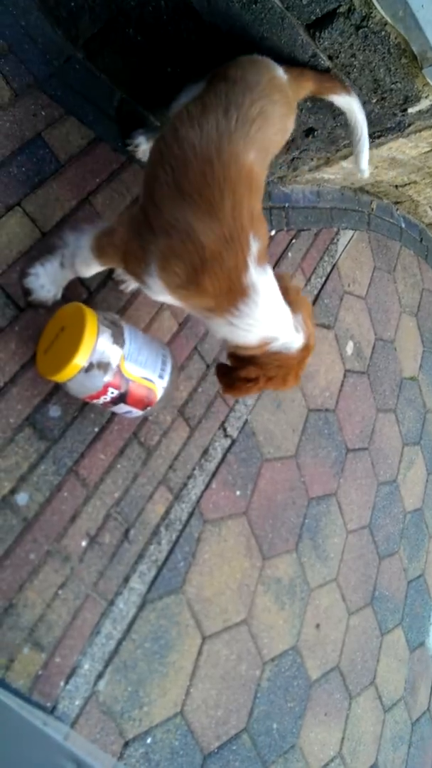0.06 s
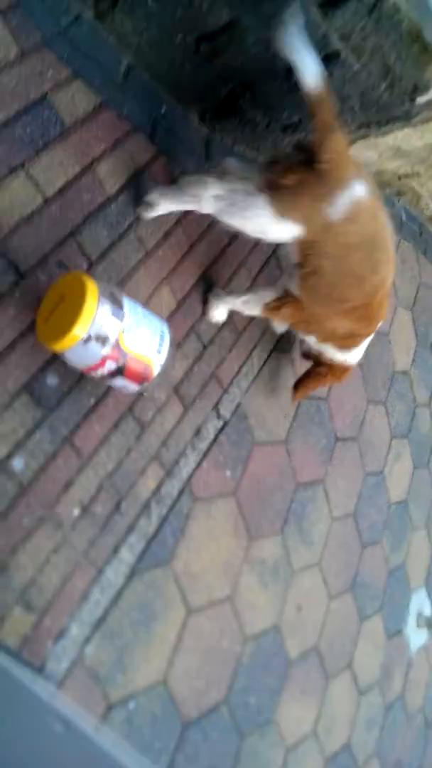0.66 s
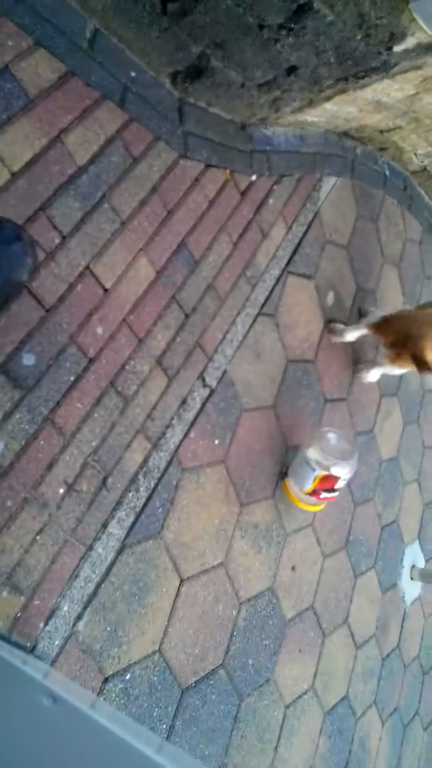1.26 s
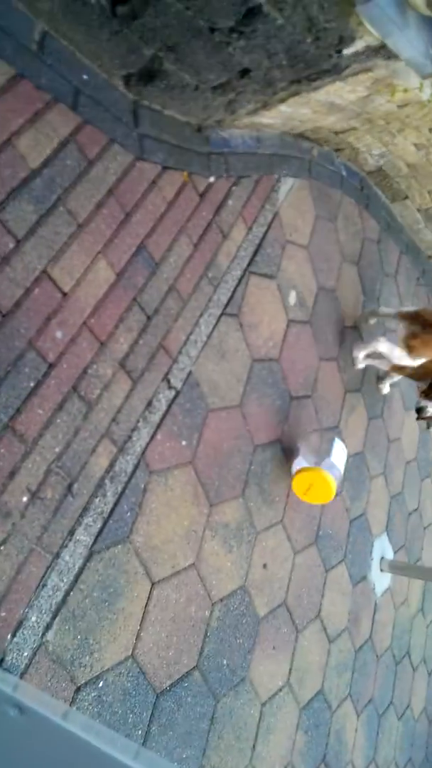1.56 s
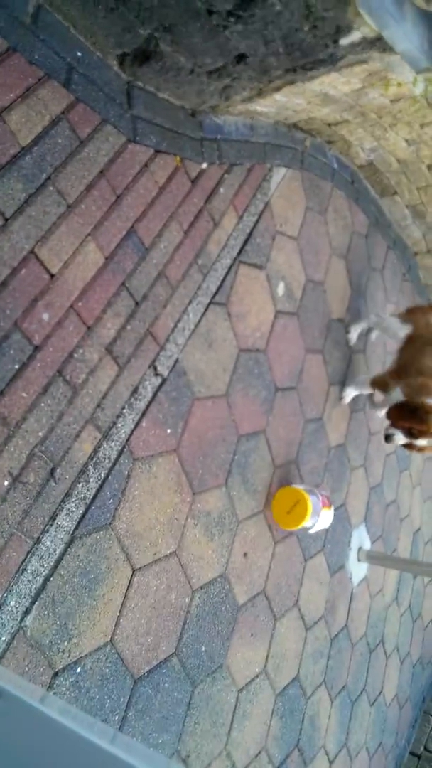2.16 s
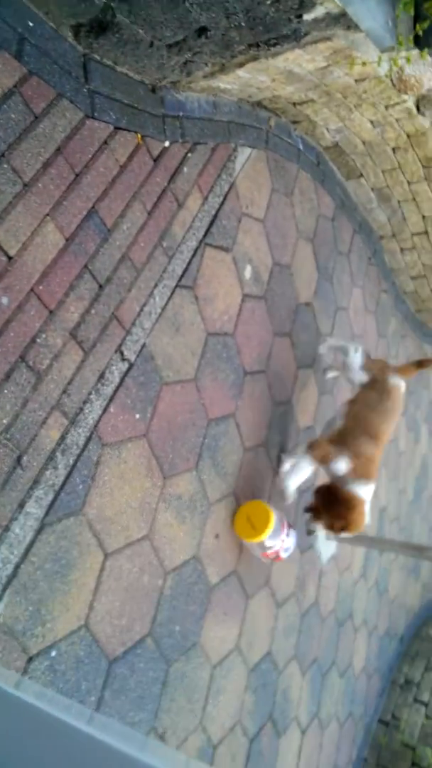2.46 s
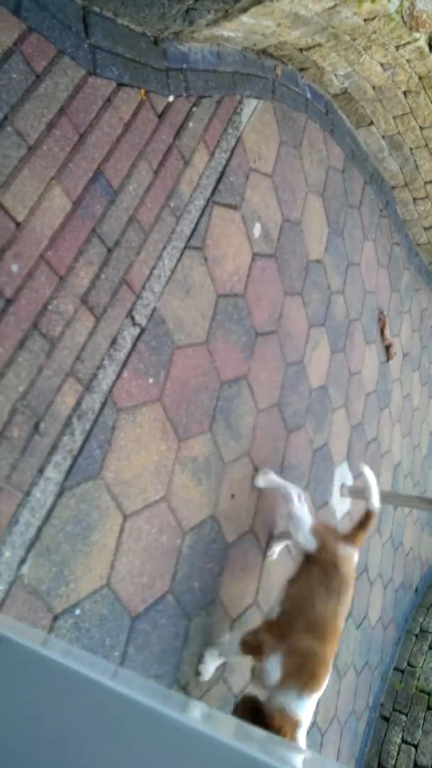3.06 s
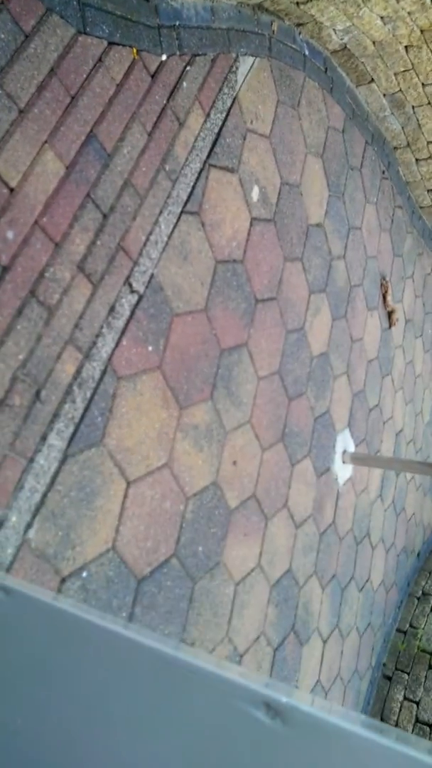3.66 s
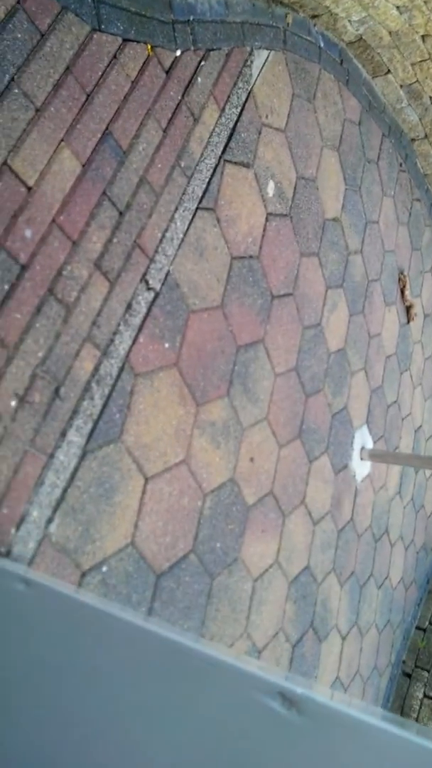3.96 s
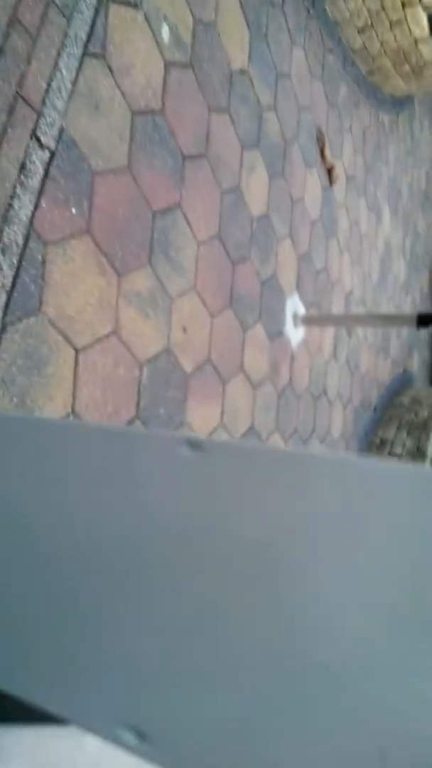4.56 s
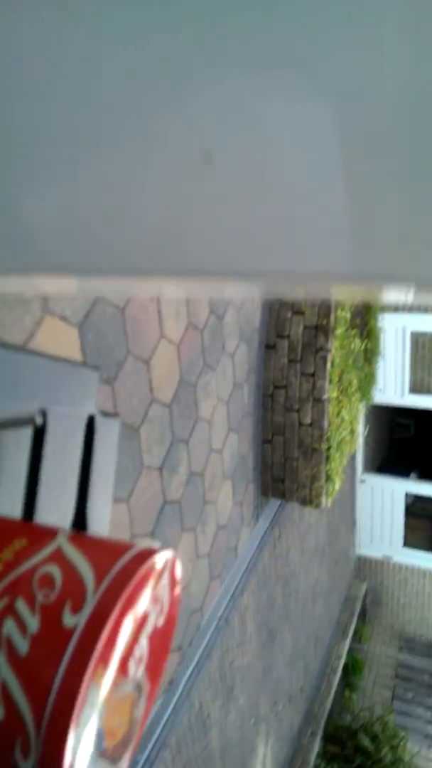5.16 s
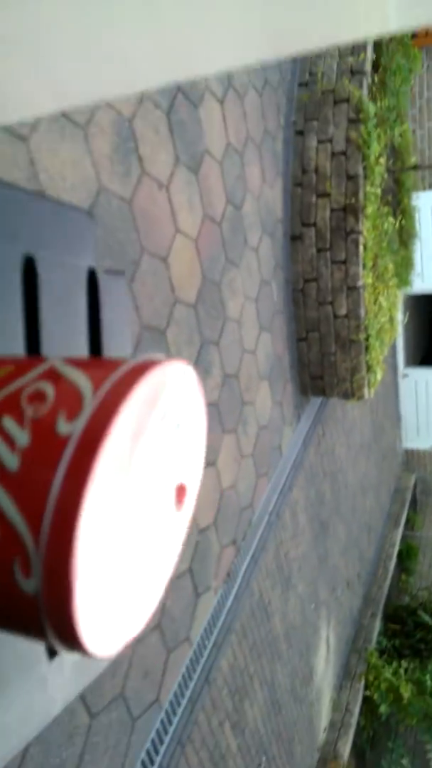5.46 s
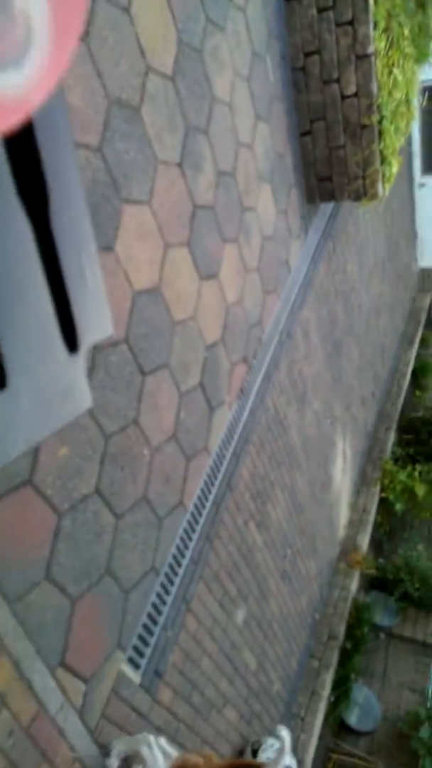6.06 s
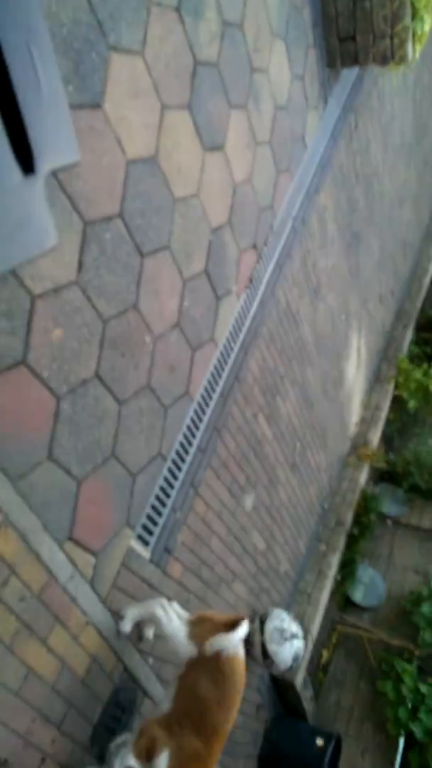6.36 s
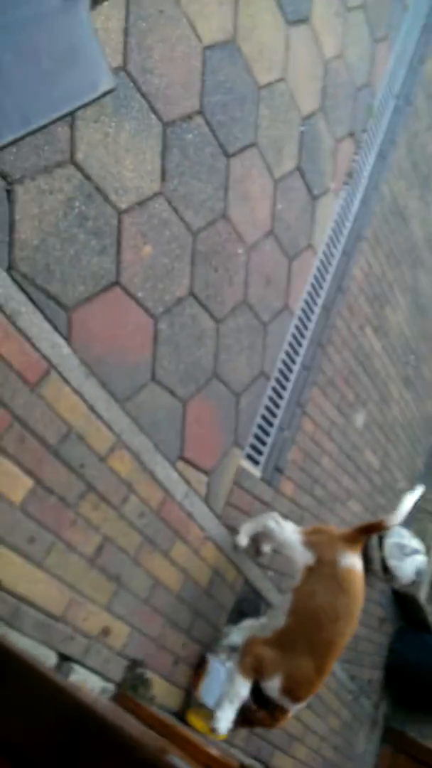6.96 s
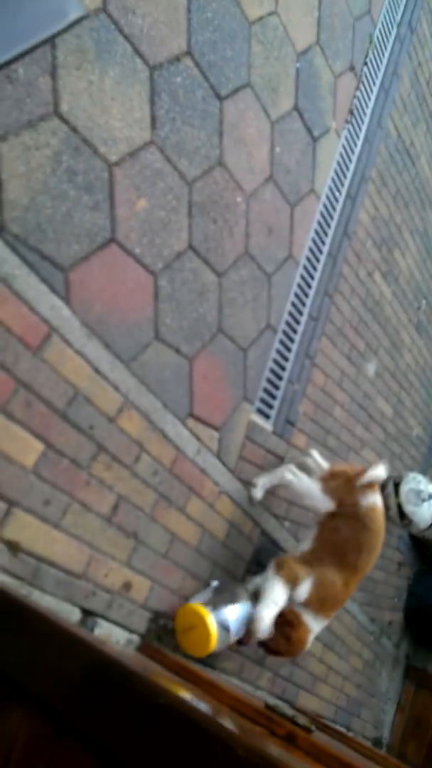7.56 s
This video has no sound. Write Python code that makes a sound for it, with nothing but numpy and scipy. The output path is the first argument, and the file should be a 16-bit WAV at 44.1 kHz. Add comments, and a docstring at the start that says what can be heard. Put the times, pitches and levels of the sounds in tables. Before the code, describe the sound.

A hollow clatter breaks a faint outdoor hush as a kicked plastic tub bounces and rolls over paving stones. Claws tick as a puppy gives chase, then pushes the tub into a second, slightly more distant run of knocks and sharp scrapes. After a short lull come light, nearer scratches of paws on plastic and stone. The hand-held stereo microphones catch a little wind rumble and sound duller on the left.

```python
"""A paved yard, heard through a hand-held pair of microphones, the left one muffled, air rumbling on both.
Out of the hush an empty plastic tub with a screw lid is kicked: it bounces with a hollow ring, then
its rim skids and ticks as it rolls off. A puppy gives chase, claws clicking on the grit. Further off,
with more echo from the walls, the tub is shoved, knocks again and slides to rest. Last, closer to the
microphones, the puppy paws and scrabbles at it."""
import sys
import numpy as np
from scipy import signal
from scipy.fft import rfft, irfft
from scipy.io import wavfile
from scipy.ndimage import map_coordinates

SR = 44100
rng = np.random.default_rng(int(sys.argv[2]) if len(sys.argv) > 2 else 0)


def generate_wav(sig):
    """Save sig (samples, or channels by samples) to the path in sys.argv[1] as 16-bit PCM at SR."""
    pcm = np.round(np.clip(np.atleast_2d(sig).T, -1, 1) * 32767).astype(np.int16)
    wavfile.write(sys.argv[1], SR, pcm)


N = 344421
T = np.arange(N) / SR
AGE = np.arange(SR // 4) / SR   # seconds since a contact


def from_db(db):
    return 10 ** (np.asarray(db) / 20)


def rms_one(x):
    return x / np.sqrt(np.mean(x ** 2) + 1e-20)


def attack_one(x):
    """Scale a stereo hit to rms 1 over its first 20 ms."""
    return x / np.sqrt(np.mean(x[:, :SR // 50] ** 2) + 1e-20)


def dying(t60, age=AGE):
    """A fall of 60 dB every t60 seconds."""
    return from_db(-60 * age / t60)


def in_time(rows, outside=None):
    """Each column of a timed curve at every sample."""
    times, *columns = np.transpose(rows)
    return [np.interp(T, times, column, outside, outside) for column in columns]


def strokes(rows, attack_s, t60):
    """Gain of a run of strokes (start_s, length_s, level_db): each rises, holds and dies away."""
    return sum(from_db(db) * np.clip((T - s) / attack_s, 0, 1)
               * dying(t60, np.clip(T - s - length, 0, 2 * t60)) for s, length, db in rows)


def add(out, start_s, sound):
    """Mix a stereo sound in at start_s."""
    i = max(int(start_s * SR), 0)
    out[:, i:i + sound.shape[1]] += sound[:, :N - i]


def convolve(x, response):
    """Pass x through a response, keeping its length."""
    return signal.fftconvolve(x, response, axes=1)[:, :x.shape[1]]


def band(x, low_hz, high_hz):
    return signal.sosfilt(signal.butter(3, [low_hz, high_hz], "band", fs=SR, output="sos"), x + 1e-18)


def colour(x, spectrum, size=2048):
    """A causal (minimum-phase) filter with the given spectrum."""
    hz, db = np.transpose(spectrum)
    curve_db = np.interp(np.log(np.arange(size // 2 + 1) * SR / size + 1), np.log(hz), db)
    cepstrum = irfft(np.log(from_db(curve_db)))
    cepstrum[1:size // 2] *= 2
    cepstrum[size // 2 + 1:] = 0
    return convolve(x, irfft(np.exp(rfft(cepstrum)))[None])


def resonance(x, hz, width_hz):
    """A broad peak at hz; rms 1."""
    radius = np.exp(-np.pi * width_hz / SR)
    feedback = [1, -2 * radius * np.cos(2 * np.pi * hz / SR), radius * radius]
    return rms_one(signal.lfilter([1, 0, -1], feedback, x + 1e-18))


def note(hz, t60):
    """One struck resonance with a rounded onset, alike at both microphones."""
    struck = np.sin(2 * np.pi * hz * AGE) * dying(t60)
    return attack_one(np.ones((2, 1)) * band(struck, hz / 2, 2 * hz))


def pair(size, apart):
    """Stereo noise: a shared part plus each microphone's own, weighted by apart."""
    return (rng.standard_normal(size) + apart * rng.standard_normal((2, size))) / np.hypot(1, apart)


def drift(rate_hz):
    """A line wandering through random points of spread 1."""
    knots = rng.standard_normal(4000)
    return np.interp(T * rate_hz, np.arange(len(knots)), knots)


def grains(size, per_s, spread_db, apart):
    """Sand grains catch and slip: random clicks of uneven size."""
    sizes = from_db(spread_db * np.minimum(rng.exponential(1, size), 4))
    return rms_one(pair(size, apart) * sizes * (rng.random(size) < per_s / SR))


# Spectrum of the open air in the yard: frequency_hz, level_db
HUSH_SPECTRUM = [(30, 5.5), (100, -6), (270, -19), (500, -6.5), (1200, -11), (2200, -9), (3700, -10.5),
                 (4500, -19.5), (7000, -25.5), (11000, -17.5), (16000, -29.5)]
# Its slow rise and fall: time_s, level_db
HUSH_LEVELS = [(0, -56.5), (0.8, -53), (6.1, -57), (7.8, -54.5)]
def yard_hush():
    """Steady outdoor noise, wide across the two microphones."""
    return from_db(in_time(HUSH_LEVELS)[0]) * rms_one(colour(pair(N, apart=1.0), HUSH_SPECTRUM))


# Spectrum of air right on the microphone ports: frequency_hz, level_db
PORT_SPECTRUM = [(20, 6.5), (45, -4), (90, -6), (170, -8), (260, -12.5), (500, -17.5), (1500, -81)]
# Buffets as the hand swings: start_s, length_s, level_db
GUSTS = [(1.76, 0.039, -39), (5.04, 0.076, -37.5), (5.4, 0.29, -48.5), (7.37, 0.16, -46.5)]
def port_rumble(calm_db=-64, calm_lumps_db=-6, gust_lumps_db=6):
    """Air moving over the ports rumbles faintly, swelling in lumpy gusts."""
    calm = from_db(calm_db + calm_lumps_db * drift(rate_hz=3.6))
    gusts = strokes(GUSTS, attack_s=0.019, t60=0.96) * from_db(gust_lumps_db * drift(rate_hz=25))
    return (calm + gusts) * rms_one(colour(pair(N, apart=0.13), PORT_SPECTRUM))


# Share of echo, greater as the tub moves away from the microphones: time_s, echo_db
ECHO_SHARE = [(0.8, -13.5), (2.2, -11.5), (3.5, -5.5), (7.8, -14)]
def yard_echo(action, t60=0.23):
    """Walls round the yard send back scattered echoes in a middle and a treble band."""
    age = np.arange(SR // 2) / SR
    onset = np.clip((age - .004) / 0.0035, 0, 1)
    scatter = grains(len(age), per_s=2500, spread_db=3.0, apart=1.58) * onset
    tail = (band(scatter, 212, 3580) + band(scatter, 6500, 13800)) * dying(t60, age)
    sent = action * from_db(in_time(ECHO_SHARE)[0])
    return convolve(sent, tail / np.sqrt(np.sum(tail ** 2) / 2))


# Dull bumps of shoe, paws and hand: start_s, level_db
THUDS = [(0.825, -34), (5.039, -35), (5.078, -31.5), (5.416, -34), (6.537, -54), (6.723, -47), (7.401, -45)]
def thuds(push_hz=150, push_t60=0.026, tail_db=-3, tail_t60=0.3):
    """Soft contacts give a short low push and a dull tail."""
    out = np.zeros((2, N))
    for s, db in THUDS:
        tail = attack_one(band(pair(len(AGE), apart=0.09) * dying(tail_t60), 95, 240))
        add(out, s, from_db(db) * attack_one(note(push_hz, push_t60) + from_db(tail_db) * tail))
    return out


# Spectrum of grit on the paving: frequency_hz, level_db
GRIT_SPECTRUM = [(3000, -5), (5000, 0.5), (6800, -8.5), (8500, 0.5), (11000, 3.5), (13000, 0),
                 (15000, -6.5), (16500, -33.5)]
# Single grains cracking under rim or claw: start_s, level_db
SAND_SNAPS = [(1.751, -32), (2.245, -37), (2.364, -45.5), (2.902, -28), (3.463, -34.5), (7.569, -36.5)]
def sand_snaps(t60=0.014):
    """Sand breaks with a very short, bright click."""
    out = np.zeros((2, N))
    for s, db in SAND_SNAPS:
        burst = pair(len(AGE), apart=0.83) * dying(t60)
        add(out, s, from_db(db) * attack_one(colour(burst, GRIT_SPECTRUM)))
    return out


# Spectrum of a paw scuffing the stone: frequency_hz, level_db
SCUFF_SPECTRUM = [(90, -13), (160, -30), (280, -10), (420, -0.5), (680, -1.5), (900, 6.5), (1700, 3.5),
                  (2700, 5.5), (4000, 5), (6000, -4.5), (12000, -20.5)]
# The puppy's claws on the paving: start_s, scuff_db, grit_db
CLAWS = [(2.362, -62, -58), (2.594, -47, -44), (2.636, -57, -39), (2.738, -60, -41.5), (2.769, -47, -37.5),
         (2.804, -61, -32), (2.849, -32.5, -24.5), (2.899, -62, -41), (2.948, -60, -35),
         (3.075, -41.5, -45), (3.141, -38, -37), (3.243, -44, -41), (3.275, -62, -36.5),
         (3.356, -72, -36.5), (3.46, -44, -36), (6.698, -71, -48), (6.926, -72, -45), (7.186, -67, -52),
         (7.298, -54, -35), (7.398, -51, -31), (7.57, -34, -47), (7.649, -51, -47)]
def claws(scuff_t60=0.11, grit_t60=0.07):
    """A claw lands with a tick and slides on a little."""
    out = np.zeros((2, N))
    for s, scuff_db, grit_db in CLAWS:
        slide = grains(len(AGE), per_s=27000, spread_db=-0.5, apart=1.6) * (1 + 0.5 * dying(t60=.01))
        scuff = attack_one(colour(slide * dying(scuff_t60), SCUFF_SPECTRUM))
        grit = attack_one(colour(slide * dying(grit_t60), GRIT_SPECTRUM))
        add(out, s, from_db(scuff_db) * scuff + from_db(grit_db) * grit)
    return out


# Paws raking the ground beside the tub: start_s, length_s, scuff_db, grit_db, rasp_hz
RAKES = [(2.818, 0.2, -50, -35.5, 2510), (6.532, 0.12, -52, -57, 1230), (6.669, 0.12, -51.5, -53, 1100),
         (6.886, 0.068, -47, -56, 1390), (7.286, 0.032, -39.5, -32.5, 2700),
         (7.371, 0.082, -34, -43.5, 1920), (7.471, 0.048, -32.5, -50, 1470), (7.525, 0.037, -32, -36, 1990),
         (7.683, 0.049, -40.5, -48, 2400)]
PAW_ATTACK_S, PAW_T60_S = 0.022, 0.13
def scrabbling(jerk_db=3, ring_db=-8, peak_db=-6):
    """Pads and claws rake the tub over sandy bricks in jerks; each stroke rasps at its own pitch."""
    sand = grains(N, per_s=6000, spread_db=1.5, apart=.8)
    rake = rms_one(sand * from_db(jerk_db * drift(rate_hz=110)))
    rasp = rms_one(colour(rake + from_db(ring_db) * turning_ring(rake, RAKES), SCUFF_SPECTRUM))
    grit = rms_one(colour(rake, GRIT_SPECTRUM))
    out = np.zeros((2, N))
    for s, length, scuff_db, grit_db, hz in RAKES:
        scuff = rms_one(rasp + from_db(peak_db) * resonance(rasp, hz, width_hz=640))
        stroke = strokes([(s, length, 0)], PAW_ATTACK_S, PAW_T60_S)
        out += stroke * (from_db(scuff_db) * scuff + from_db(grit_db) * grit)
    return out


# Last pushes over the bricks, near the microphones: start_s, length_s, level_db
RUBS = [(6.535, 0.11, -49), (6.71, 0.096, -54), (6.91, 0.042, -53), (7.385, 0.186, -50),
        (7.695, 0.025, -46.5)]
def tub_rubbing(hum_hz=430, width_hz=110, rumble_db=-2):
    """The sliding tub hums over a low rumble."""
    rub = pair(N, apart=0.16)
    hum = resonance(resonance(rub, hum_hz, width_hz), hum_hz, width_hz)
    rumble = rms_one(band(rub, 80, 335))
    return strokes(RUBS, PAW_ATTACK_S, PAW_T60_S) * rms_one(hum + from_db(rumble_db) * rumble)


# Modes of the tub's plastic wall: pitch_hz, level_db, t60_s
WALL_MODES = [(1047, -4.5, 0.1), (1133, -1, 0.04), (1294, -0.5, 0.012), (1517, 4, 0.057), (1713, 5, 0.03),
              (1726, -2, 0.062), (2502, 8.5, 0.032), (2906, 6, 0.034), (3400, 3.5, 0.037), (3940, 1, 0.042)]
def tub_ring(vary_db, detune, apart):
    """The wall's answer to one contact; where it is touched shifts each mode's strength and pitch."""
    out = np.zeros((2, len(AGE)))
    for hz, db, t60 in WALL_MODES:
        strength, bend, *mic_offsets = rng.standard_normal(4)
        # high modes radiate in lobes and reach the two microphones out of step
        phase = apart * hz / 2000 * np.array(mic_offsets)[:, None] + np.pi * rng.integers(2)
        mode = np.sin(2 * np.pi * hz * (1 + detune * bend) * AGE + phase)
        out += from_db(db + vary_db * strength) * dying(t60) * mode
    return out


# The low and the high note of the air in the tub: pitch_hz, t60_s
AIR_NOTES = [(389, 0.089), (765, 0.14)]
def turning_ring(force, rows, turn_s=.09, hollow_db=-4):
    """The contact travels round the tub, changing the mix of modes, from first row to last."""
    out = np.zeros((2, N))
    hollow = from_db(hollow_db) * sum(note(hz, t60) for hz, t60 in AIR_NOTES)
    for s in np.arange(rows[0][0], rows[-1][0], turn_s):
        stretch = force[:, int(s * SR):int((s + turn_s) * SR)]
        ring = rms_one(tub_ring(vary_db=5.0, detune=0.031, apart=0.74) + hollow)
        add(out, s, signal.fftconvolve(stretch, ring, axes=1))
    return out / np.sqrt(np.mean(out[out != 0] ** 2))


# Spectrum of the plastic shell scraping on stone: frequency_hz, level_db
SHELL_SPECTRUM = [(150, -7.5), (280, -16.5), (400, -8), (750, -10), (1050, 1), (1300, -7.5), (1650, 0.5),
                  (2100, -4.5), (2550, 1.5), (3000, -1.5), (4000, 2), (4900, -4), (6500, -15), (12000, -20)]
# The roll across the yard: time_s, shell_db, grit_db (before grit_boost_db)
ROLL = [(1.072, -52, -60), (1.27, -35, -50), (1.61, -47.5, -56.5), (1.82, -58, -55), (2.08, -49.5, -62),
        (2.45, -52.5, -57), (2.78, -47.5, -58.5), (2.87, -40.5, -80), (3.24, -52, -57), (3.89, -52.5, -60),
        (4.2, -42.5, -51.5), (4.46, -55, -55.5), (4.76, -39.5, -41.5), (5.11, -50, -43.5),
        (5.551, -47, -68), (5.789, -48, -59), (5.9, -67.5, -89.5)]
# Slides after a kick or a shove: start_s, length_s, level_db
SLIDES = [(1.09, 0.072, -29.5), (3.24, 0.063, -42.5), (3.52, 0.069, -37.5), (3.66, 0.024, -40.5),
          (3.89, 0.032, -31), (4.55, 0.067, -28), (4.65, 0.0075, -27.5), (4.78, 0.1, -36.5),
          (4.99, 0.085, -31.5), (5.155, 0.027, -35), (5.28, 0.12, -38.5), (5.41, 0.072, -35.5),
          (5.53, 0.089, -47), (5.62, 0.059, -37.5)]
def tub_rolling(ring_db=-7, bump_db=3, grit_boost_db=2, slide_grit_db=-7.5):
    """The tub rides over rough stone, louder with each shove; bumps feed the shell and throw grit."""
    shell_db, grit_db = in_time(ROLL, outside=-120)
    slide = strokes(SLIDES, attack_s=0.0056, t60=0.1)
    bumps = from_db(bump_db * drift(rate_hz=130))
    rub = rms_one(grains(N, per_s=5000, spread_db=6.5, apart=1.4) * bumps)
    shell = rms_one(colour(rub + from_db(ring_db) * turning_ring(rub, ROLL), SHELL_SPECTRUM))
    grit = rms_one(colour(grains(N, per_s=12000, spread_db=2.5, apart=1.6) * bumps, GRIT_SPECTRUM))
    shell_gain = np.hypot(from_db(shell_db), slide)
    grit_gain = np.hypot(from_db(grit_db + grit_boost_db), from_db(slide_grit_db) * slide)
    return shell_gain * shell + grit_gain * grit


# The ring of the rim as the tub rolls: time_s, pitch_hz
RIM_PITCH = [(1.9, 3500), (2.25, 4150), (2.7, 3210), (4.1, 3790)]
def rim_hz(time_s):
    """The rim's pitch at a given time."""
    return np.interp(time_s, *np.transpose(RIM_PITCH))


def chance_catches(per_s=28, above_roll_db=-0.5, vary_db=3, spread_octaves=0.1):
    """The rim catches at random, harder when the roll is louder; rows as in RIM_CATCHES."""
    roll_s, shell_db, _ = np.transpose(ROLL)
    times = roll_s[0] + np.cumsum(rng.uniform(0, 2, 300)) / per_s
    sizes, bends = rng.standard_normal((2, 300))
    levels = np.interp(times, roll_s, shell_db) + above_roll_db + vary_db * sizes
    pitches = rim_hz(times) * 2 ** (spread_octaves * (bends - .5))
    return [(s, db, hz) for s, db, hz in zip(times, levels, pitches) if s < roll_s[-1]]


# Clear catches of the rolling rim on the stone: start_s, level_db, tone_hz
RIM_CATCHES = [(1.895, -35.5, 2900), (2.058, -36.5, 3400), (2.125, -40.5, 3900), (2.199, -25, 2510),
               (2.2149, -29.5, 3430), (2.246, -26, 3900), (2.2689, -32.5, 2540), (2.295, -34.5, 3450),
               (2.307, -32.5, 3930), (2.329, -41, 2960), (2.66, -45.5, 3250), (2.696, -41, 3400),
               (2.753, -36.5, 3280), (2.773, -37.5, 2620), (2.796, -30, 3430), (2.808, -38, 3420),
               (2.832, -31.5, 3700), (7.573, -35, 2000)]
def rim_ticks(attack_s=0.00064, snap_t60=0.038, peak_db=2, grit_db=-19,
              rim_db=-2, rim_t60=0.03, rim_delay_s=0.0017):
    """Each catch is a dry snap; the rim rings briefly just after it."""
    out, age = np.zeros((2, N)), AGE[:SR // 20]
    rim_decay = (age > rim_delay_s) * dying(rim_t60, age)
    for s, db, hz in RIM_CATCHES + chance_catches():
        force = pair(len(age), apart=0.65) * np.minimum(age / attack_s, 1) * dying(snap_t60, age)
        snap = rms_one(colour(force, SHELL_SPECTRUM))
        peak = from_db(peak_db) * resonance(snap, hz, width_hz=520)
        phase = 2 * np.pi * rng.normal(rim_hz(s), 170) * age + rng.normal(0, 0.54, (2, 1))
        rim = from_db(rim_db) * rms_one(rim_decay * np.sin(phase))
        grit = from_db(grit_db) * rms_one(colour(force, GRIT_SPECTRUM))
        add(out, s, from_db(db) * attack_one(snap + peak + rim + grit))
    return out


# Loud skids of the rim on the paving: middle_s, level_db, swell_s, rasp_hz
SKIDS = [(1.149, -20.5, 0.0047, 3800), (1.34, -23, 0.0071, 3260), (1.869, -26.5, 0.011, 2780),
         (1.984, -26.5, 0.0073, 3650), (1.994, -24, 0.015, 3600), (2.029, -26, 0.01, 3560),
         (2.158, -21, 0.0081, 3520), (2.368, -29.5, 0.0052, 4400), (2.454, -35, 0.0037, 2840),
         (2.519, -32, 0.0038, 2780), (2.608, -32, 0.011, 2840), (4.025, -18, 0.024, 3770),
         (4.126, -22.5, 0.0078, 3830), (4.246, -18.5, 0.0077, 3760), (4.382, -23, 0.0072, 3940),
         (4.541, -14, 0.0028, 4870), (4.578, -24.5, 0.0027, 3600), (4.794, -22.5, 0.0091, 3500),
         (4.822, -23, 0.008, 3700), (4.881, -23.5, 0.0096, 2250), (5.338, -31.5, 0.011, 3520),
         (5.536, -25, 0.0085, 4060), (5.574, -23.5, 0.017, 3450)]
def rim_skids(squeak_db=2, ring_db=-10, grit_db=-12, tail_db=-17, tail_t60=.12,
              lead_s=.02, burst_s=.009):
    """The rim sticks and slips for milliseconds: a scrape swells, rasps and leaves the shell ringing."""
    out = np.zeros((2, N))
    from_middle_s = np.abs(AGE - lead_s)
    tail = from_db(tail_db) * (AGE > lead_s) * dying(tail_t60, from_middle_s)
    for s, db, swell_s, hz in SKIDS:
        grip = np.exp(-from_middle_s / swell_s)
        slips = grains(len(AGE), per_s=21000, spread_db=0.5, apart=1.0) * (grip + tail)
        rasp = rms_one(colour(slips, SHELL_SPECTRUM))
        squeak = from_db(squeak_db) * resonance(rasp, hz, width_hz=1200)
        wall = convolve(slips, tub_ring(vary_db=-12.5, detune=0.008, apart=0.14))
        ring = from_db(ring_db) * rms_one(colour(wall, SHELL_SPECTRUM))
        grit = from_db(grit_db) * rms_one(colour(slips, GRIT_SPECTRUM))
        gain = from_db(db) * np.sqrt(burst_s / AGE[-1])   # the energy of burst_s at level_db
        add(out, s - lead_s, gain * rms_one(rasp + squeak + ring + grit))
    return out


def chatter(count, gap_s, loss_db):
    """A contact is a first touch and a few weaker ones as the light tub rocks on the stone."""
    force = np.zeros(len(AGE))
    force[0] = 1
    later_s = np.cumsum(rng.uniform(.3, 1.7, count)) * gap_s
    strengths = from_db(loss_db) * rng.standard_normal(count) * np.exp(-np.arange(count) / 2)
    force[np.minimum(later_s * SR, len(AGE) - 1).astype(int)] += strengths
    return force


# The tub hitting the paving: start_s, dent_db, dent_hz, low_note_db, high_note_db, grit_db
KNOCKS = [(0.828, -34, 580, -32.5, -38, -42.5), (0.895, -32, 656, -36, -44, -42.5),
          (0.970, -20, 632, -45, -23.5, -40), (1.0702, -15, 1480, -27, -22, -24.5),
          (1.097, -27, 2910, -30.5, -43.5, -24.5), (1.229, -26, 3360, -56, -44, -23),
          (1.2535, -22.5, 2480, -29.5, -28, -29), (1.322, -32, 2330, -41, -58, -31.5),
          (1.333, -33, 1290, -31, -32.5, -39), (1.387, -38, 1490, -32.5, -37, -36.5),
          (1.422, -35, 1160, -34.5, -36.5, -44), (1.452, -38.5, 1080, -36.5, -42, -46),
          (1.488, -37.5, 1750, -51, -50, -42), (1.638, -38, 570, -43.5, -50, -35.5),
          (1.751, -32, 550, -31, -37.5, -38), (1.846, -36, 1700, -49, -49, -32),
          (1.942, -34, 1760, -64, -46, -38), (2.019, -32, 1640, -32.5, -34, -56),
          (3.437, -39, 1030, -47, -41, -40), (3.519, -41.5, 647, -54, -41.5, -40),
          (3.661, -35, 530, -50, -40.5, -41), (3.699, -39, 640, -42, -49, -40.5),
          (3.794, -38, 920, -37.5, -43, -44.5), (3.819, -41, 1020, -38, -46, -46),
          (3.862, -40.5, 940, -47, -40, -51), (4.012, -32.5, 1140, -42, -32, -44),
          (4.076, -24.5, 677, -27, -19, -33), (4.218, -43, 637, -42.5, -40, -32),
          (4.422, -28.5, 520, -30.5, -32.5, -34), (4.642, -30.5, 494, -29, -41, -37),
          (4.725, -35, 513, -38.5, -45, -47), (5.039, -32, 330, -25.5, -45, -40),
          (5.072, -30.5, 314, -26, -40, -37)]
def tub_knocks(dent_t60=0.0099, wall_db=2, peak_db=-5, crack_db=12.5, crack_t60=0.058,
               buzz_db=-3, buzz_t60=0.4, cutoff_ratio=2.86, grit_t60=0.046):
    """The wall dents with a pop, cracks and rings, and the air inside hums on."""
    out = np.zeros((2, N))
    crack_decay = from_db(crack_db) * dying(crack_t60) + from_db(buzz_db) * dying(buzz_t60)
    for s, dent_db, dent_hz, *notes_db, grit_db in KNOCKS:
        touches = chatter(count=4, gap_s=0.0074, loss_db=-12.0)[None]
        crack = pair(len(AGE), apart=0.64) * crack_decay
        dent = convolve(note(dent_hz, dent_t60), touches)
        ring = convolve(tub_ring(vary_db=3.0, detune=0.018, apart=0.69) + crack, touches)
        peak = attack_one(resonance(ring, dent_hz, width_hz=250))   # modes near the dent ring most
        lowpass = signal.butter(1, cutoff_ratio * dent_hz, fs=SR)   # a low dent wakes little treble
        wall = signal.lfilter(*lowpass, attack_one(band(ring, 800, 4300)))
        plastic = dent + from_db(wall_db) * wall + from_db(peak_db) * peak
        hollow = sum(from_db(db) * note(hz, t60) for db, (hz, t60) in zip(notes_db, AIR_NOTES))
        sand = grains(len(AGE), per_s=21000, spread_db=7.0, apart=3.4) * dying(grit_t60)
        grit = attack_one(colour(sand, GRIT_SPECTRUM))
        add(out, s, from_db(dent_db) * plastic + hollow + from_db(grit_db) * grit)
    return out


# Where the chase is in front of the pair: time_s, left_minus_right_db, left_lag_samples
BEARING = [(0.8, 0, 7.5), (1.3, -1, 4), (2.2, -1, 0), (2.8, -3.5, 1.5), (3.6, 2, -6), (4.7, 3, -10),
           (5.5, 0.5, -8.5), (7.5, -2, -3.5)]
def at_microphones(x):
    """Level and arrival time at each microphone follow the action."""
    pan_db, lag = in_time(BEARING)
    left = map_coordinates(x[0], [np.arange(N) - lag], order=3, mode="nearest")
    return np.array([left * from_db(pan_db / 2), x[1] * from_db(-pan_db / 2)])


def scene():
    """The tub and the puppy with their yard echo, over port rumble and the outdoor hush."""
    action = tub_knocks() + rim_skids() + rim_ticks() + tub_rolling()
    action = action + claws() + sand_snaps() + scrabbling() + tub_rubbing() + thuds()
    return at_microphones(action + yard_echo(action)) + port_rumble() + yard_hush()


def record(dry, muffle_hz=4700, leak_db=-27, hiss_db=-74, cutoff_hz=16200):
    """The muffled left port passes little treble; faint hiss; peaks are rounded and the top is cut."""
    dull = signal.sosfilt(signal.butter(4, muffle_hz, fs=SR, output="sos"), dry[0])
    left = np.roll(dull, -4) + from_db(leak_db) * dry[0]   # 4 samples early offsets the filter's lag
    heard = np.array([left, dry[1]]) + from_db(hiss_db) * rng.standard_normal((2, N))
    top_cut = signal.ellip(10, .1, 90, cutoff_hz, fs=SR, output="sos")
    return signal.sosfilt(top_cut, np.tanh(heard))


dry = scene()
out = record(dry)
generate_wav(out)
```